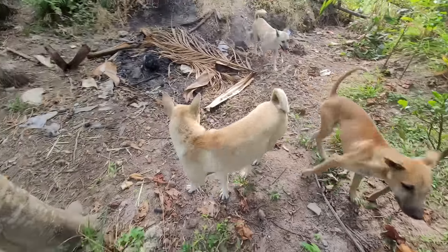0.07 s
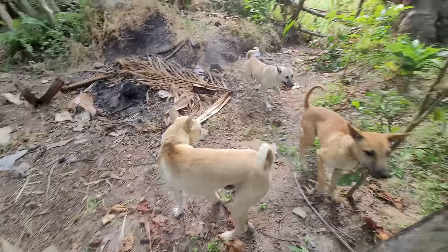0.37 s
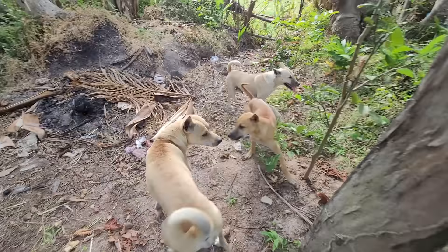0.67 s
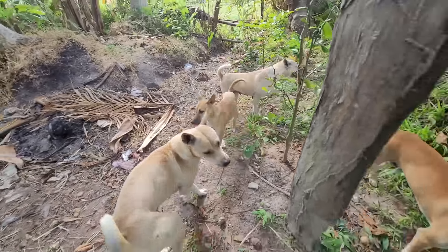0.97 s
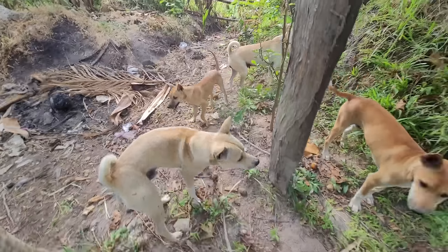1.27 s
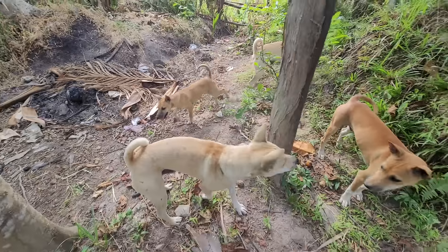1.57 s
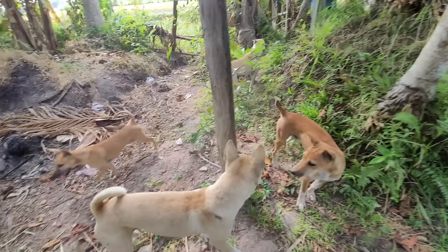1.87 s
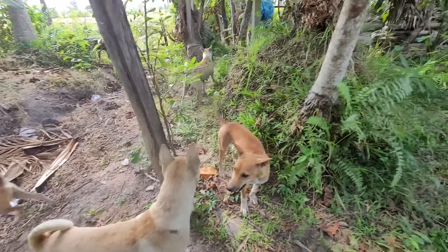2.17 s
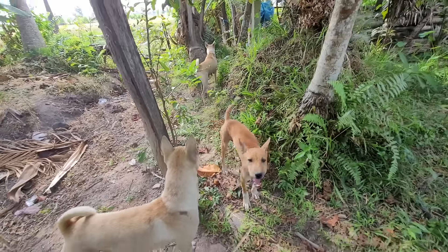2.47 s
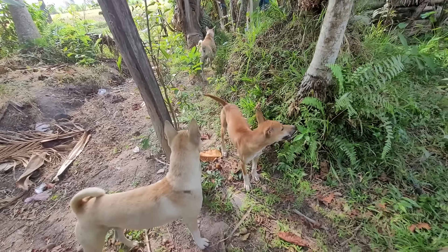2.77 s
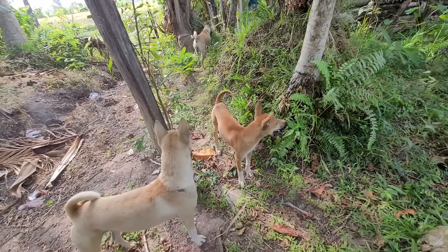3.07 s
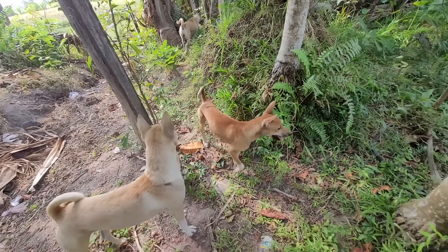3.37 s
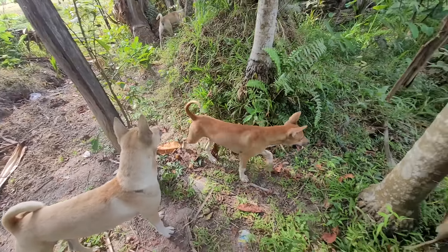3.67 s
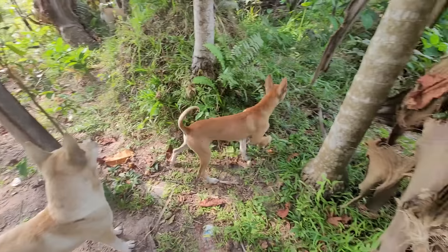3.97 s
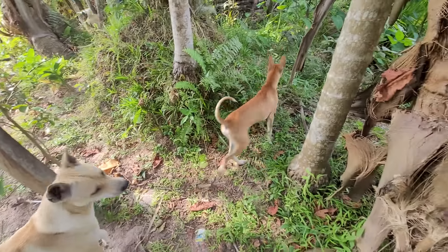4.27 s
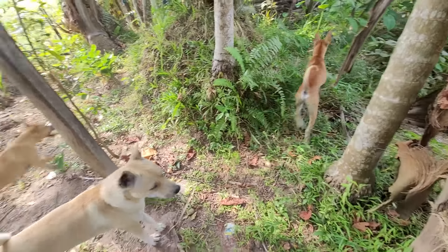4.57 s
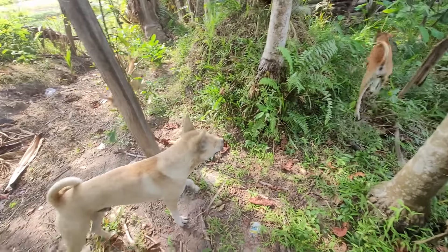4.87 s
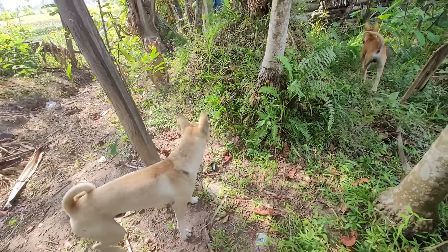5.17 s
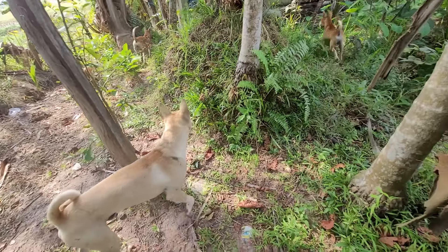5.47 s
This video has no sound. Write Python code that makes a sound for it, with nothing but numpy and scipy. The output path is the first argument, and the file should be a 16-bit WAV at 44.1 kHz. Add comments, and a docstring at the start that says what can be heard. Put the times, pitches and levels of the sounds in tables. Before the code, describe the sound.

Dogs play on dry leaves at the edge of a wood. From the start, paws scuff and crunch the litter, twigs snap and sticks knock lightly. A distant engine swells over the first 1.5 seconds and keeps up a low chug under a faint hiss of air, while wind rumbles on the carried microphone. From about 0.9 seconds, thin, high whistling whines come and go, and dull thuds land near 1, 1.8, 3.7, 4 and 4.8 seconds. A few faint, far birds call from 1.9 seconds. At 2.3 seconds one dog gives a loud, high yelp that breaks and falls in pitch, ending by 2.7 seconds; it is the loudest sound. The rustling eases, then picks up again at 3.5 seconds. At 4.6 seconds comes a short, quieter, gruff yip, and scuffing and whining continue until about 5.5 seconds.

```python
"""Dogs play on dry leaves at the edge of a wood. From the start a far one-cylinder engine chugs and swells
under a hiss of air, and wind buffets the carried microphone. Paws scuff the leaves, snap twigs and knock
sticks. From about 0.9 s thin whistling whines come and go and feet thud on the soil; from 1.9 s a few
far birds call. At 2.3 s one dog gives a loud falling yelp, its overtones sweeping through the throat's
resonances. At 4.6 s slack vocal folds puff out a gruff yip, and the scuffing and whining go on."""
import sys
import numpy as np
from scipy import signal
from scipy.fft import rfft, irfft
from scipy.io import wavfile
from scipy.ndimage import uniform_filter1d

SR = 44100
rng = np.random.default_rng(int(sys.argv[2]) if len(sys.argv) > 2 else 0)


def wav_record(signal):
    """Record a signal, one row per channel, as 16-bit PCM in the file named by sys.argv[1]."""
    frames = np.transpose(np.atleast_2d(signal))
    bounded = np.clip(frames, -1, 1)
    # unit amplitude maps onto the largest positive 16-bit level
    quanta = np.round(bounded * 32767).astype(np.int16)
    wavfile.write(sys.argv[1], SR, quanta)


N = 243431
T = np.arange(N) / SR
HZ = np.fft.rfftfreq(N, 1 / SR)


def gain_of(db):
    """Decibels to amplitude."""
    return 10 ** (np.asarray(db) / 20)


def unit_rms(x):
    """Scales to rms 1."""
    return x / np.sqrt(np.mean(x ** 2) + 1e-20)


def curve_at(points, hz):
    """Interpolates on a log-frequency axis."""
    f, value = np.transpose(points)
    return np.interp(np.log(hz + 1), np.log(f + 1), value)


def during(start, end, edge_s):
    """1 from start to end, with soft edges centred on both."""
    return np.clip(np.minimum(T - start, end - T) / edge_s + .5, 0, 1)


def swell(middle, length):
    """Bell-shaped envelope."""
    return np.exp(-2 * ((T - middle) / length) ** 2)


def blow(start, t60_s, rise_s):
    """Envelope of an impact: fast rise, exponential decay."""
    age = np.maximum(T - start, 0)
    return (1 - np.exp(-age / rise_s)) * gain_of(np.maximum(-60 * age / t60_s, -200))


def pan(db):
    """Channel gains for a left-minus-right level."""
    return gain_of(np.array([[db / 2], [-db / 2]]))


def filtered(x, gain):
    """Applies a gain per frequency."""
    return irfft(rfft(x) * gain, N)


def wander(rate_hz):
    """Low-passed noise of rms 1."""
    return unit_rms(filtered(rng.standard_normal(N), np.exp(-(HZ / rate_hz) ** 2)))


def resonances(modes, hz):
    """Gain of a set of resonances at hz."""
    return sum(gain_of(db) / (1 + (2 * (hz - f) / width) ** 2) for f, width, db in modes)


# Stereo image of the noises. Each row: frequency in Hz, left minus right in dB.
BALANCE = [(60, 4.5), (200, 2), (380, -4.5), (1290, -3.5), (2400, -4), (4400, -10), (6200, 3), (8100, 4),
           (15000, 1.5)]
# Each row: frequency in Hz, left-right coherence 0-1.
COHERENCE = [(60, 0.94), (130, 0.95), (290, 0.32), (640, 0.56), (1400, 0.022), (3100, 0), (15000, 0.0015)]
def stereo(pair, spectrum):
    """Colours two unrelated signals and gives them the coherence and balance of the two microphones."""
    same = np.clip(curve_at(COHERENCE, HZ), -1, 1)
    left, other = rfft(pair) * gain_of(curve_at(spectrum, HZ))
    right = same * left + np.sqrt(1 - same ** 2) * other
    side = gain_of(curve_at(BALANCE, HZ) / 2)
    return unit_rms(irfft(np.array([left * side, right / side]), N))


def hiss(spectrum):
    """Steady two-channel noise."""
    return stereo(rng.standard_normal((2, N)), spectrum)


def crackle(spectrum, per_s, spread_db, grain_s):
    """Many tiny fractures, each a noise burst of random size."""
    size = gain_of(spread_db * np.minimum(rng.exponential(1, N), 4))
    fractures = size * (rng.random(N) < per_s / SR)
    power = signal.lfilter([1], [1, -np.exp(-2 / (grain_s * SR))], fractures ** 2)
    return stereo(np.sqrt(power) * rng.standard_normal((2, N)), spectrum)


# Open-air spectrum. Each row: frequency in Hz, relative density in dB.
AIR_SPECTRUM = [(150, -22.5), (280, 1), (570, -6), (1500, -9.5), (2400, -3), (4400, -8.5), (6200, -20),
                (7800, -28.5), (9500, -19), (16000, -32)]
def air(level_db=-58.5, flicker_db=0.767):
    """Faint, slightly unsteady hiss of the open air."""
    return gain_of(level_db + flicker_db * wander(11)) * hiss(AIR_SPECTRUM)


# Exhaust spectrum. Each row: frequency in Hz, relative level in dB.
EXHAUST_SPECTRUM = [(20, -36), (42, 4.5), (62, 3), (84, -11.5), (105, 7), (135, -3.5), (170, 2), (205, 1),
                    (250, -40), (400, -27), (800, -65.5)]
FIRING_HZ, FIRING_OFFSET_S = 20.729, 0.01682
HUNT_HZ, HUNT_PERIOD_S, FASTEST_S = .948, 3.244, 1.799
def engine(level_db=-44.5, rise_db=11.5, rise_s=1.47, unevenness=0.28, echo_s=0.01252, echo_gain=0.52):
    """One exhaust pulse a firing, speed hunting slowly; distance leaves the bass, the land an echo."""
    rate_hz = FIRING_HZ + HUNT_HZ * np.cos(2 * np.pi * (T - FASTEST_S) / HUNT_PERIOD_S)
    phase = 2 * np.pi * (np.cumsum(rate_hz) / SR - FIRING_OFFSET_S * FIRING_HZ)
    chug = sum(gain_of(curve_at(EXHAUST_SPECTRUM, k * rate_hz)) * np.cos(k * phase) for k in range(1, 20))
    chug *= 1 + unevenness * wander(12)
    chug += echo_gain * np.interp(T - echo_s, T, chug)
    return gain_of(level_db - rise_db * np.maximum(1 - T / rise_s, 0)) * unit_rms(chug)


# Wind rumble. Each row: frequency in Hz, relative density in dB.
RUMBLE_SPECTRUM = [(15, -25.5), (30, -21.5), (48, -0.5), (70, -7), (120, -10.5), (220, -23.5), (400, -37),
                   (900, -60)]
# Microphone swings. Each row: middle in seconds, length in seconds, level in dB.
MIC_SWINGS = [(0.102, 0.21, -50), (0.99, 0.21, -38.5), (1.76, 0.61, -44.5), (2.748, 1, -46.5),
              (3.79, 0.47, -44), (4.868, 0.15, -39)]
def buffeting(still_db=-49):
    """Air rumbles on the carried microphone, more strongly during each swing."""
    swings = sum(gain_of(db) * swell(middle, length) for middle, length, db in MIC_SWINGS)
    return (gain_of(still_db) + swings) * hiss(RUMBLE_SPECTRUM)


# Bouts of moving about. Each row: start in seconds, end in seconds, level in dB.
MOVING_BOUTS = [(0, 0.677, -48.5), (0.732, 1.775, -52), (2.5, 3.017, -60), (3.55, 4.34, -58),
                (4.366, 5.516, -54.5)]
def stirring(rest_db=-84.5, patchy_db=2.5):
    """Envelope of the stirred leaf litter: uneven during each bout, almost nil at rest."""
    moving = sum(gain_of(db) * during(start, end, edge_s=0.19) for start, end, db in MOVING_BOUTS)
    return gain_of(rest_db) + moving * gain_of(patchy_db * wander(5))


# Dry leaves breaking. Each row: frequency in Hz, relative density in dB.
LEAF_SPECTRUM = [(880, -38), (1500, -20.5), (2400, -6), (3200, -1), (4600, 1), (6600, -6), (7800, -12),
                 (11400, -9.5), (16000, -15.5)]
def ticks(gain_db=-6):
    """Single leaf stalks give way as the dogs shift their weight."""
    return gain_of(gain_db) * stirring() * crackle(LEAF_SPECTRUM, per_s=62, spread_db=1, grain_s=0.00099)


# Scraped soil. Each row: frequency in Hz, relative density in dB.
SOIL_SPECTRUM = [(120, -27), (300, -1), (700, -0.5), (1400, 3), (2200, 1), (4000, 0), (9000, -42)]
# Steps. Each row: middle in seconds, length in seconds, level in dB, treble boost in dB.
PAW_SCUFFS = [(0.168, 0.04, -34.5, -1.5), (0.402, 0.023, -33, 6.5), (0.504, 0.35, -57, 10),
              (0.768, 0.05, -30.5, -4), (0.902, 0.032, -40.5, 3.5), (1.164, 0.035, -40, 1.5),
              (1.218, 0.058, -35, 8), (1.377, 0.23, -58, -11), (1.557, 0.11, -62, 8.5),
              (1.936, 0.033, -56, 10.5), (2.068, 0.17, -49.5, 4), (2.227, 0.068, -46.5, -18),
              (2.278, 0.049, -45, -0.5), (2.565, 0.043, -50.5, 7), (3.48, .012, -56, -1),
              (3.506, 0.025, -42.5, -0.5), (3.571, 0.041, -39, -3), (3.716, 0.02, -35, -4),
              (3.762, 0.057, -36.5, -1), (3.923, 0.012, -44.5, 0), (4.103, 0.044, -41.5, 0),
              (4.2, 0.04, -38.5, 0), (4.245, 0.025, -41, 4.5), (4.421, 0.029, -47.5, 3),
              (4.684, 0.039, -48, 5.5), (4.906, 0.13, -54.5, 3), (5.204, 0.075, -43, -2.5),
              (5.35, 0.021, -44.5, 9.5), (5.467, 0.056, -45.5, -1.5)]
def scuffs(stir_fizz_db=1.0, stir_soil_db=-3, fizz_hz=6500, scrape_db=-36.5, scrape_db_per_db=0.28):
    """Each step crushes leaves and scrapes the soil beneath; the driest leaves fizz in the treble."""
    powers = (stirring() * gain_of([[0], [stir_fizz_db], [stir_soil_db]])) ** 2  # crunch, fizz, soil
    for middle, length, db, treble_db in PAW_SCUFFS:
        gains = gain_of([[db], [db + treble_db], [scrape_db + scrape_db_per_db * db]])
        powers += (swell(middle, length) * gains) ** 2
    leaves = crackle(LEAF_SPECTRUM, per_s=1600, spread_db=2.8, grain_s=.0014)
    crunch = filtered(leaves, 1 / (1 + (HZ / fizz_hz) ** 8))
    fizz = leaves - crunch
    soil = crackle(SOIL_SPECTRUM, per_s=500, spread_db=1.5, grain_s=0.003)
    return sum(np.sqrt(power) * layer for power, layer in zip(powers, (crunch, fizz, soil)))


# Each row: start in seconds, relative level in dB, twice the left-minus-right level in dB.
TWIG_SNAPS = [(0.3937, -23.5, 18), (0.4681, -23, 10), (0.7412, -24, -10), (1.145, -20, 16),
              (1.2205, -21, 32), (1.34, -39, -29), (1.3724, -30, 7), (1.697, -39.5, -1.5),
              (2.499, -32, -20), (2.6688, -36.5, -19), (3.5204, -26.5, -11), (3.703, -25, 3),
              (3.7592, -26.5, 16), (3.899, -28.5, -1), (4.9616, -24.5, -9), (5.075, -31.5, -2),
              (5.3475, -33, 0)]
def snaps(gain_db=-4, shiver_db=-11):
    """Dry twigs and leaf ribs crack; the leaves around them shiver a moment longer."""
    envelope = np.zeros((2, N))
    for start, db, side_db in TWIG_SNAPS:
        crack = blow(start, t60_s=0.013, rise_s=.0001)
        shiver = gain_of(shiver_db) * blow(start, t60_s=0.12, rise_s=0.0015)
        envelope += gain_of(db) * pan(side_db / 2) * (crack + shiver)
    return gain_of(gain_db) * envelope * hiss(LEAF_SPECTRUM)


# Each row: start in seconds, level in dB, pitch in Hz.
STICK_KNOCKS = [(0.46, -38.5, 1100), (0.497, -37.5, 1480), (0.553, -34, 1620), (0.607, -38, 1670),
                (1.143, -32, 1780), (1.858, -38.5, 1180), (3.71, -33, 1450), (4.847, -44, 1350),
                (4.962, -34.5, 1400), (5.086, -42.5, 1480)]
def knocks():
    """A stick knocked on the ground rings briefly under a dull click."""
    click, out = hiss(SOIL_SPECTRUM), np.zeros((2, N))
    for start, db, hz in STICK_KNOCKS:
        ring = 0.99 * np.sin(2 * np.pi * hz * (T - start))
        out += gain_of(db) * blow(start, t60_s=0.022, rise_s=0.00027) * (ring + click)
    return out


# Each row: start in seconds, length in seconds, first pitch in Hz, last pitch in Hz,
# bow above the straight glide in Hz, relative peak in dB, place of the peak 0-1.
WHINE_GLIDES = [(0.88, .11, 4740, 4640, -390, -39.5, 0.98), (1.491, .07, 4080, 4480, 1.5, -42.5, 0.08),
                (1.552, .065, 4490, 4560, 3.5, -43.5, 0.8), (1.598, .06, 4490, 5150, 0, -51.5, 0.56),
                (2.102, 0.026, 1100, 1040, 2, -45, .35), (2.439, .04, 7080, 7190, 20.5, -36.5, 0.72),
                (2.51, .11, 6450, 6620, -140, -59, 0.9), (2.626, 0.055, 6950, 7230, 57, -52.5, 0),
                (2.961, 0.12, 4630, 5200, 23, -63, .85), (4.126, 0.11, 4800, 5500, 6, -50.5, 0.5),
                (4.552, .075, 4600, 4400, -74, -33.5, 0.1), (4.848, 0.24, 4584, 5540, 295.5, -39, 0.31),
                (5.073, .23, 5450, 5440, 14, -38.5, 0.5), (5.415, .11, 4495, 5100, 204, -48.5, 1)]
MUZZLE_HZ, MUZZLE_WIDTH_HZ, MUZZLE_DB = 8550, 1600, -18.5
def whines(gain_db=2.5, rise_db=5.5, fade_db=24, flutter_db=4.5, jitter=0.0045, waver=0.0024):
    """Nearly pure, trembling whistles glide, swell and fade; the muzzle lets a faint octave through."""
    out = np.zeros(N)
    tremble = 1 + jitter * wander(150) + waver * wander(25)
    for start, length, first_hz, last_hz, bow_hz, peak_db, peak_at in WHINE_GLIDES:
        along = np.clip((T - start) / length, 0, 1)
        top = np.clip(peak_at, .05, .95)
        pitch = first_hz + (last_hz - first_hz) * along + bow_hz * np.sin(np.pi * along ** 0.85)
        rising, fading = (1 - along / top) ** 2, ((along - top) / (1 - top)) ** 2
        db = peak_db - np.where(along < top, rise_db * rising, fade_db * fading)
        phase = 2 * np.pi * np.cumsum(pitch * tremble) / SR
        octave = resonances([(MUZZLE_HZ, MUZZLE_WIDTH_HZ, MUZZLE_DB)], 2 * pitch)
        tone = np.sin(phase) + octave * np.sin(2 * phase)
        out += gain_of(db) * during(start, start + length, edge_s=.004) * tone
    return np.sqrt(2) * out * gain_of(gain_db + flutter_db * wander(56))


# Low scraping noise after each thump. Each row: frequency in Hz, relative density in dB.
LOW_SCRAPE_SPECTRUM = [(80, -25), (220, 4.5), (450, -2), (900, -4), (2500, -14.5), (8000, -59)]
# Each row: start in seconds, level in dB, pitch in Hz.
THUMPS = [(0.929, -20, 97), (1.02, -20.5, 68.5), (1.813, -17.5, 63), (2.796, -26.5, 86), (3.705, -18, 96),
          (4.005, -17.5, 55), (4.801, -24, 96), (4.868, -21.5, 107)]
def thumps(scrape_db=-25):
    """Footfall or microphone handling: a few low cycles, and a scrape that grows with level and pitch."""
    push, scrape = np.zeros((2, N))
    for start, db, hz in THUMPS:
        cycles = np.sin(2 * np.pi * hz * (T - start))
        push += gain_of(db) * blow(start, t60_s=0.057, rise_s=0.0049) * cycles
        scrape += gain_of(db) * (hz / 100) ** 2 * blow(start, t60_s=0.49, rise_s=0.00049)
    return push + gain_of(scrape_db) * scrape * hiss(LOW_SCRAPE_SPECTRUM)


# Each row: middle in seconds, length in seconds, pitch in Hz, level in dB.
BIRD_CALLS = [(1.86, 0.092, 2300, -57.5), (3.067, 0.058, 2265, -59), (3.318, 0.043, 2390, -53.5),
              (3.643, 0.032, 2420, -51.5), (3.98, 0.049, 2110, -59.5), (4.72, 0.22, 710, -62.5),
              (5.076, 0.098, 734, -63)]
def birds(warble=0.04):
    """Short distant calls, blurred by the trees."""
    out = np.zeros(N)
    for middle, length, hz, db in BIRD_CALLS:
        phase = 2 * np.pi * np.cumsum(hz * (1 + warble * wander(200))) / SR
        out += gain_of(db) * swell(middle, length) * np.sqrt(2) * np.sin(phase)
    return out


# Falling pitch with upward breaks. Each row: time in seconds, pitch in Hz.
YELP_PITCH = [(2.312, 1530), (2.337, 1348), (2.367, 1354), (2.377, 1514), (2.403, 1561), (2.417, 1292),
              (2.44, 1149), (2.451, 1015), (2.49, 900.4), (2.544, 925), (2.558, 1099), (2.576, 1007),
              (2.593, 1140), (2.615, 863), (2.671, 565)]
# Brief level dips. Each row: middle in seconds, length in seconds, gain in dB.
YELP_LEVEL_DIPS = [(2.392, 0.023, -3.5), (2.442, 0.0067, -8), (2.463, 0.0068, -13), (2.502, 0.014, -9)]
GAPE_S, GAPE_LENGTH_S, GAPE_CLEARING = 2.579, .062, 0.72
GAPE_DIP_DB, GAPE_BOOST_DB, MOUTH_SHUT_DB = -5, 21, -2.5
HELD_ROUGH, FALL_ROUGH, TIRING_PER_S, STEEP_OCT_PER_S = 0.041, 0.36, .9, 8
def yelp_controls(level_db=-12, attack_s=0.032, sag_db_per_s=33, release_s=0.035):
    """Pitch, strength, mouth boost, roughness. One gape lifts the octave and weakens the fundamental."""
    times, hz = np.transpose(YELP_PITCH)
    pitch = np.interp(T, times, hz)
    age = np.maximum(T - times[0], 0)
    gape = during(GAPE_S - GAPE_LENGTH_S / 2, GAPE_S + GAPE_LENGTH_S / 2, edge_s=.01)
    envelope = np.minimum(age / attack_s, 1) ** 2 * np.clip((times[-1] - T) / release_s, 0, 1)
    dips_db = sum(db * swell(middle, length) for middle, length, db in YELP_LEVEL_DIPS)
    strength = envelope * gain_of(level_db - sag_db_per_s * age + GAPE_DIP_DB * gape + dips_db)
    # The voice roughens as its pitch drops, more so as it tires; the wide jaw clears it.
    fall_oct_per_s = uniform_filter1d(np.maximum(-np.gradient(np.log2(pitch)) * SR, 0), size=700)
    steepness = np.minimum(fall_oct_per_s / STEEP_OCT_PER_S, 1)
    rough = HELD_ROUGH + (FALL_ROUGH + TIRING_PER_S * age) * steepness ** 2
    rough = np.clip(rough * (1 - GAPE_CLEARING * gape), 0, 1)
    return pitch, strength, MOUTH_SHUT_DB + GAPE_BOOST_DB * gape, rough


# Throat resonances. Each row: centre in Hz, width in Hz, gain in dB.
YELP_MODES = [(1220, 80, 1), (1990, 300, -13.5), (2618, 236, -11), (3010, 210, -12.5), (4620, 220, -15.5),
              (5352, 120, -22), (5860, 360, -35), (13230, 5000, -51)]
# Rasp in the voice. Each row: frequency in Hz, relative density in dB.
RASP_SPECTRUM = [(400, -40.5), (750, -22), (1000, 4), (1400, -12.5), (2000, -0.5), (2500, -4), (3450, -7),
                 (4200, -17.5), (5000, -15.5), (7800, -24.5), (12500, -28), (16000, -28)]
def yelp(jitter=0.029, flutter=0.18, mouth_hz=2100, mouth_width_hz=230, rasp_db=-17, sideband_hz=370):
    """A strong fundamental whose overtones flare as they sweep through the throat's resonances."""
    pitch, strength, mouth_db, rough = yelp_controls()
    tension = gain_of(44 * np.minimum(np.log2(pitch / 1300), 0))  # slack folds give a rounder tone
    pitch = pitch * (1 + jitter * rough * wander(300))
    phase = 2 * np.pi * np.cumsum(pitch) / SR
    voice = np.cos(phase)
    for k in range(2, 12):
        hz = k * pitch
        mouth = gain_of(mouth_db * np.exp(-((hz - mouth_hz) / mouth_width_hz) ** 2 / 2))
        shimmer = 1 + (rough + 0.083) * wander(230)  # overtones break up before the fundamental
        overtone = (tension if k > 2 else 1) * np.cos(k * phase)
        voice += resonances(YELP_MODES, hz) * mouth * shimmer * overtone
    # A weak second oscillation at high tension and uneven cycles add sidebands.
    second = np.cos(2 * np.pi * np.cumsum(sideband_hz * (1 + 0.076 * wander(79.34))) / SR)
    voice *= 1 + 0.05 * tension * second + flutter * rough * wander(200)
    puffs = rng.standard_normal(N) * (1 + np.cos(phase))
    rasp = unit_rms(filtered(puffs, gain_of(curve_at(RASP_SPECTRUM, HZ))))
    return strength * (np.sqrt(2) * voice + gain_of(rasp_db) * (rough + 0.36 * tension) * rasp)


# Throat resonances. Each row: centre in Hz, width in Hz, relative gain in dB.
YIP_MODES = [(410, 320, -7.5), (787, 92, 3), (1290, 280, -8), (2050, 640, -13.5), (3216, 120, 1),
             (4540, 620, -4)]
def yip(start_s=4.556, level_db=-31.5, pitch_hz=410, attack_s=0.0064, hold_s=0.012, t60_s=0.081):
    """Hoarse puffs from slack vocal folds ring the throat."""
    phase = 2 * np.pi * np.cumsum(pitch_hz * (1 + 0.0816 * wander(144))) / SR
    puffs = rng.standard_normal((2, N)) * (1 + np.cos(phase))
    voice = unit_rms(filtered(puffs + .5 * puffs[::-1], resonances(YIP_MODES, HZ)))
    age = np.maximum(T - start_s, 0)
    decay_db = 60 * np.clip((age - hold_s) / t60_s, 0, 2)
    return voice * np.minimum(age / attack_s, 1) * gain_of(level_db - decay_db)


def aside(x, lag_s=0.00016):
    """A sound from one side reaches the second microphone later."""
    return np.array([x, filtered(x, np.exp(-2j * np.pi * HZ * lag_s))])


def trunk_echo(x, delay_s=0.005, echo_db=-8):
    """An echo from a trunk to one side meets the two microphones in opposite phase."""
    return x + gain_of(echo_db) * np.interp(T - delay_s, T, x) * np.array([[1], [-1]])


def wood_reverb(x, near_db=-17, near_t60_s=0.16, near_per_s=1500, far_db=-31, far_t60_s=1.0):
    """Close reflections from ground and trunks, then a faint scatter from the trees."""
    t = np.arange(SR) / SR
    near, far = rng.standard_normal((2, 2, SR))
    near *= (rng.random((2, SR)) < near_per_s / SR) * gain_of(-60 * t / near_t60_s) * (t > .002)
    far *= gain_of(-60 * t / far_t60_s) * (t > .015)
    taps = sum(gain_of(db) * part / np.linalg.norm(part, axis=1, keepdims=True)
               for part, db in ((near, near_db), (far, far_db)))
    return x + signal.fftconvolve(x, taps, axes=1)[:, :N]


def scene():
    """The dogs and their footfalls in the wood, over the far engine and the open air."""
    whistles = aside(whines()) * pan(db=-6.5)
    voices = trunk_echo(yelp()) * pan(db=-2.5) + whistles + yip() * pan(db=-3.5)
    bed = (air() + engine() + thumps() + buffeting()) * pan(db=-3)
    litter = scuffs() + snaps() + ticks() + knocks()
    return wood_reverb(voices + litter + birds() * pan(db=-6.5)) + bed


def record(dry):
    """Low-pass at 15.85 kHz."""
    lowpass = signal.firwin(511, 15850, window=("kaiser", 9), fs=SR)
    return signal.oaconvolve(dry, lowpass[None], "same")


dry = scene()
out = record(dry)
wav_record(out)
```